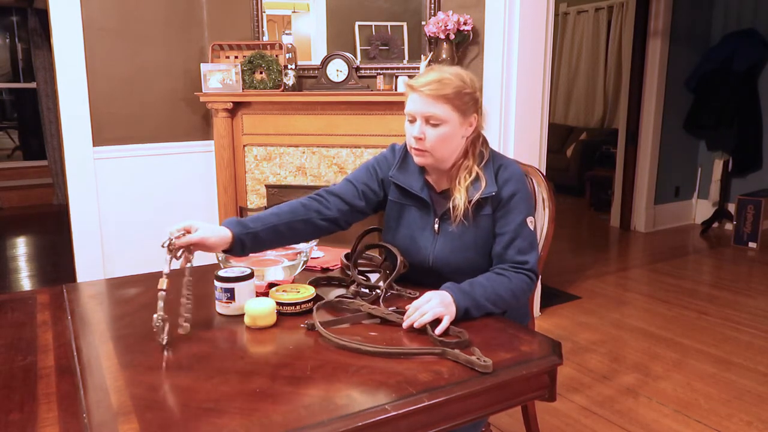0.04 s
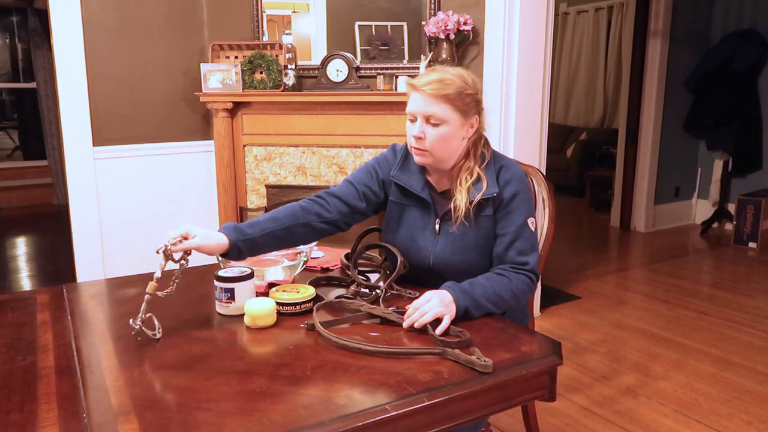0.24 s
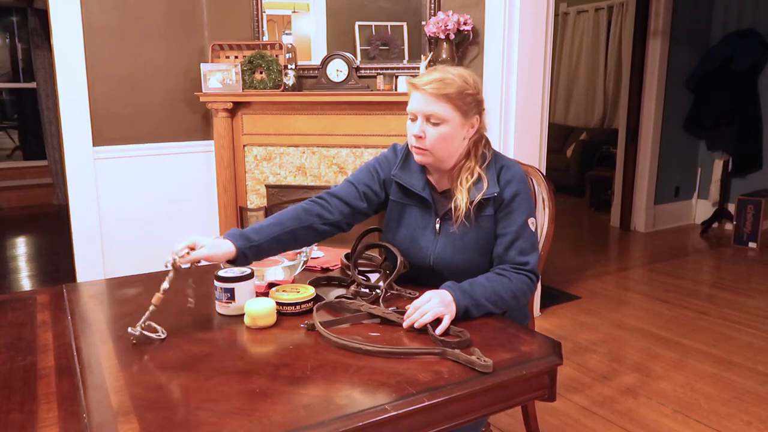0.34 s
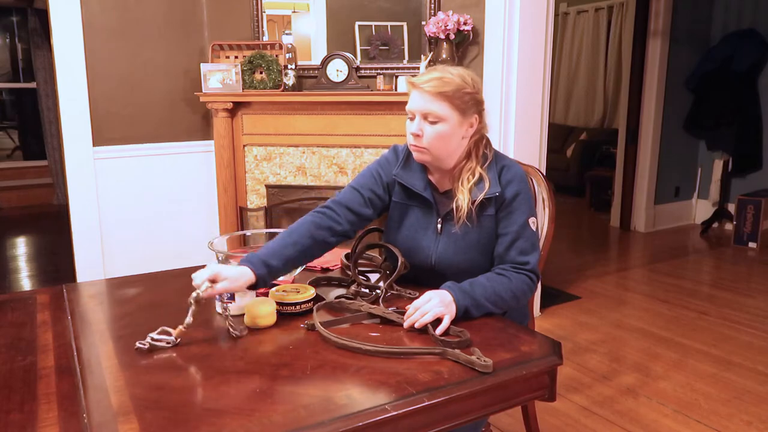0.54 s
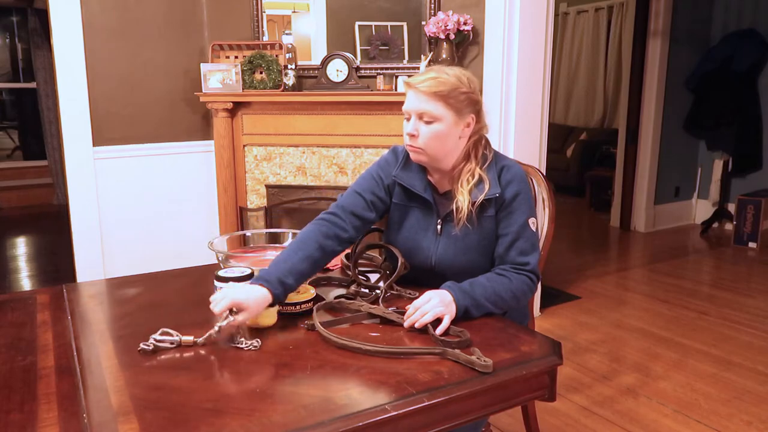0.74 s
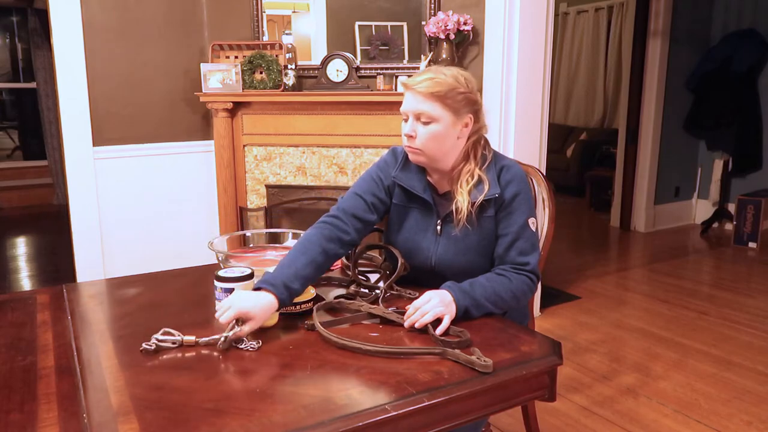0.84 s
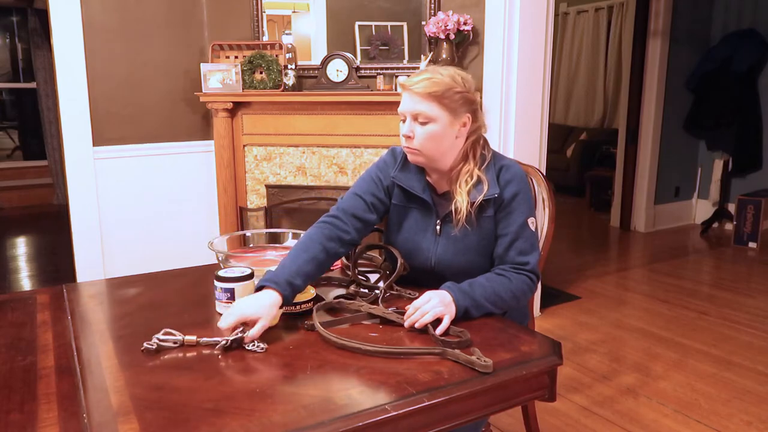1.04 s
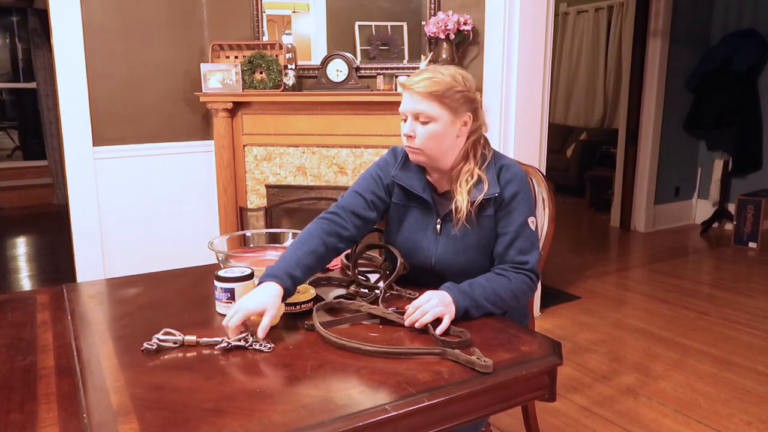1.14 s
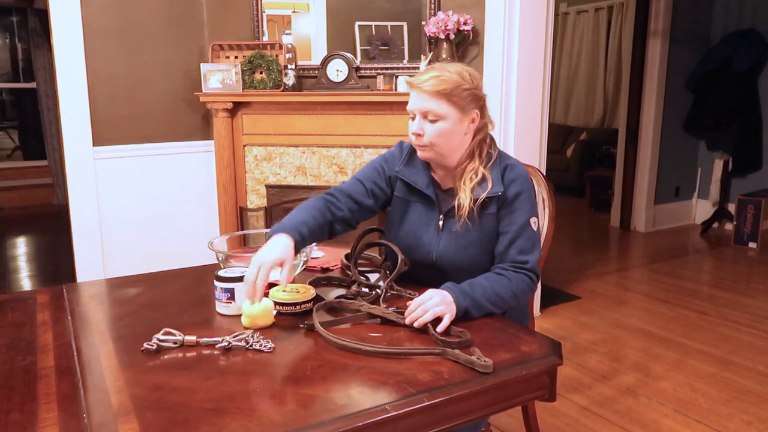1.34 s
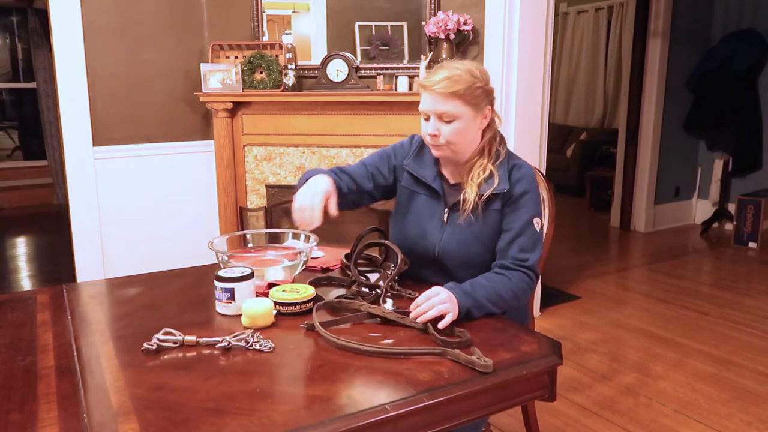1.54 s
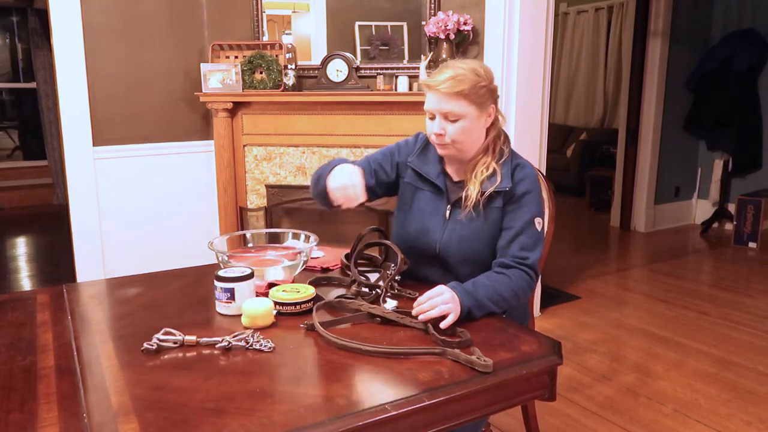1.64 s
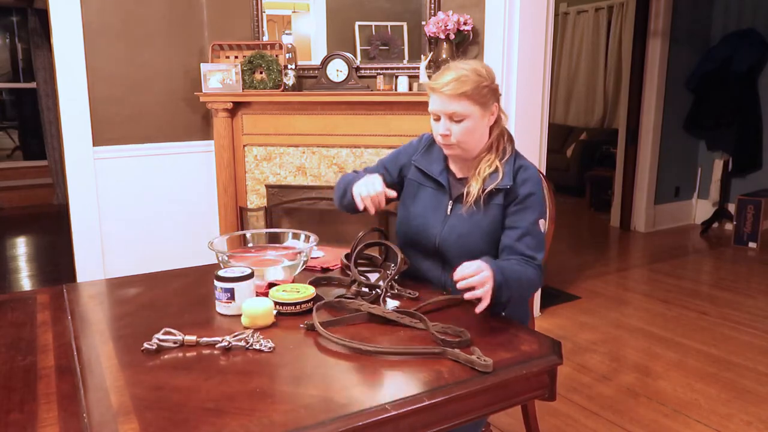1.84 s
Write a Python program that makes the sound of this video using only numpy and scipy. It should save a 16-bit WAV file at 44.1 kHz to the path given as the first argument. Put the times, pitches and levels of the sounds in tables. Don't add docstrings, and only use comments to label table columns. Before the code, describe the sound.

A metal horse bit clatters onto a wooden tabletop with a knock, sharp taps and jingling links

```python
import sys
import numpy as np
from scipy import signal
from scipy.io import wavfile
from scipy.ndimage import uniform_filter1d, minimum_filter1d

SR = 44100
rng = np.random.default_rng(int(sys.argv[2]) if len(sys.argv) > 2 else 0)


def generate_wav(signal):
    frames = np.transpose(np.atleast_2d(signal))
    scaled = np.clip(frames, -1, 1) * 32767
    pcm = np.round(scaled).astype(np.int16)
    wavfile.write(sys.argv[1], SR, pcm)


def ratio_of_db(decibels):
    return 10 ** (np.asarray(decibels, float) / 20)


N = 83790


def evened(x):
    return x / np.sqrt(np.mean(x ** 2) + 1e-20)


def read(points, hz):
    f, value = np.transpose(points)
    return np.interp(np.log(hz + 1), np.log(f + 1), value)


def add(mix, s, sound):
    part = mix[round(s * SR):][:len(sound)]
    part += sound[:len(part)]


def shaped(x, points):
    log_gain = np.log(ratio_of_db(read(points, abs(np.fft.fftfreq(4096, 1 / SR)))))
    response = np.fft.ifft(np.exp(np.conj(signal.hilbert(log_gain)))).real[:2048]
    return signal.fftconvolve(x, response)[:len(x)]


def blip(hz, cycles):
    u = np.arange(1500) / SR * hz / cycles
    wave = u ** 1.6 * np.exp(-2.4 * u ** 1.4) * np.sin(2 * np.pi * u * cycles)
    return wave / abs(wave).max()


def ring(hz, db, t60, phase, seconds, rise_s):
    t = np.arange(0, seconds, 1 / SR)
    modes = ratio_of_db(db - 60 * t[:, None] / t60) * np.sin(2 * np.pi * (hz * t[:, None] + phase))
    return modes.sum(1) * np.minimum(t / rise_s, 1)


def tail(decays):
    hz, t, z = signal.stft(rng.standard_normal(SR), SR, nperseg=256)
    fade = ratio_of_db(-60 * t / read(decays, hz)[:, None])
    x = signal.istft(z * fade, SR, nperseg=256)[1][:SR]
    x = x * np.clip(np.arange(SR) / SR / 0.0016 - .5, 0, 1)
    return x / np.linalg.norm(x)


# (time [s], peak level [dB], click pitch [Hz], wooden thump [dB re click], chime [dB re click])
CONTACTS = [(.2040, -6.5, 1325, 1, 1.5), (.4056, -3.5, 2050, -21, -16), (.4201, -3.5, 2200, -20, -14),
            (.5036, -1, 2680, -22, -10), (.5593, -.5, 2450, -24, -12), (.6316, 0, 2150, -19, -13),
            (0.442, -12, 2560, -9, -21), (.5190, -4.5, 2270, -15, -18), (0.5412, -17.5, 2860, -14, -34),
            (.5500, -9, 2900, -22.5, -10.5), (0.598, -4.5, 2500, -22.5, -17.5),
            (0.6077, -8, 2370, -19, -7.5), (0.6204, -8.5, 2400, -18.5, -23), (.6440, -16.5, 1300, -9, -3),
            (.7870, -16, 1860, -18.5, -6.5), (0.823, -8.5, 2740, -19.5, -8.5), (.8290, -19, 2240, -24, -7),
            (.8370, -14, 1700, -11, -8), (.8550, -20.5, 1620, -6, -12.5), (.8740, -12.5, 2535, -16, -13.5),
            (0.9309, -15.5, 2590, -31, -12.5), (.9551, -27.5, 2240, -30, 3), (.9675, -17, 2450, -32.5, -4),
            (1.0182, -14, 1580, -6.5, -6), (1.0345, -19.5, 1310, -4, -13), (1.0550, -19, 1090, -6.5, -14.5),
            (1.0820, -23, 1580, -8.5, -18), (1.0979, -12, 2320, -25.5, -12.5),
            (1.1100, -17, 2530, -17.5, -16), (1.1354, -26, 1170, -0.5, -14.5),
            (1.1650, -32.5, 1140, 2.5, -7), (1.2217, -36, 1596, -20.5, 0.5),
            (1.2545, -27, 1900, -29.5, -17.5), (1.3884, -34.5, 1000, -14.5, -30),
            (1.4254, -14, 2000, -11, -25), (1.43, -12.5, 1431, -17.5, -5.5), (1.456, -19, 1074, -9, -1.5),
            (1.4660, -27, 2100, -5.5, -10)]


def taps():
    clicks, chimes = np.zeros(N), np.zeros(N)
    for s, peak_db, click_hz, thump_db, chime_db in CONTACTS:
        cycles = 1.35 + .04 * max(-3.5 - peak_db, 0)
        click = blip(click_hz, cycles)
        click += ratio_of_db(-15) * blip(3350, 3.2)
        click += ratio_of_db(thump_db + 2.5) * blip(559, 1)
        click *= ratio_of_db(peak_db)
        if peak_db < -9.5:
            for late_s in np.append(0, .007 * abs(rng.uniform(-0.95, 1, 3))):
                add(clicks, s + late_s, click * ratio_of_db(-5))
        else:
            add(clicks, s, click)
        chime_hz = click_hz * (1 + .17 * rng.uniform(-0.95, 1, 4))
        phase = rng.uniform(-0.95, 1, 4)
        add(chimes, s, ring(chime_hz, peak_db + chime_db, .02, phase, seconds=.073, rise_s=.0023))
    add(clicks, CONTACTS[0][0], ratio_of_db(-11) * blip(3000, 1.35))
    return clicks, chimes


# (frequency [Hz], level [dB], t60
# [s])
TABLE_MODES = [(263.2, 3, 0.15), (398, 1, 0.34), (545.2, -2.5, 0.25), (625, -8, 0.44), (768.7, 4.5, 0.25),
               (797, -0.5, 0.15), (920, -6.5, 0.15), (1050, 8.5, 0.17), (1287, 3.5, 0.1),
               (1533, -15.5, 0.15), (1590, -16.5, 0.44), (1800, -12.5, 0.25), (2000, -11, 0.26),
               (2353, 5.5, 0.051),
               (142, -13, 0.47), (496.5, 2, 0.23)]


def tabletop():
    out = np.zeros(N)
    hz, db, t60 = np.transpose(TABLE_MODES)
    for k, (s, peak_db, _, thump_db, _) in enumerate(CONTACTS):
        strength, phase, spot = rng.random((3, len(hz)))
        if k == 0:
            sound = ring(hz, db, t60, phase, seconds=.5, rise_s=.0017)
        else:
            spot_hz = hz * (1 + .088 * (spot - .5))
            sound = ring(spot_hz, db + 9 - 14 * strength, .3 * t60, phase, seconds=.2, rise_s=.0017)
        add(out, s, ratio_of_db(peak_db + thump_db - 11) * sound)
    return out


# (time [s], level [dB])
LEG_THUDS = [
    (0.243, -40),
    (0.441, -32.5),
    (0.534, -22),
    (0.563, -36),
    (0.644, -26),
    (0.679, -28.5),
    (1.498, -27),
]


def thuds():
    out, thud_hz, cycles = np.zeros(N), 110, 2
    t = np.arange(0, 3 * cycles / thud_hz, 1 / SR)
    u = t * thud_hz / cycles
    for s, db in LEG_THUDS:
        pitch = rng.uniform(0.86, 1.4)
        add(out, s, ratio_of_db(db) * u * np.exp(1 - 2 * u) * np.sin(2 * np.pi * thud_hz * pitch * t))
    return out


# (time [s], rattle level [dB], bright jingle level [dB])
LINKS = [(.203, -80, -90), (.212, -46, -60), (.39, -52, -66), (.43, -38, -50), (.5, -38, -54),
         (.56, -33, -46), (.65, -33, -45), (.75, -42, -58), (.85, -36, -58), (.97, -38, -60),
         (1.085, -44, -62), (1.105, -31, -48), (1.2, -40, -58), (1.27, -38, -56), (1.35, -52, -68),
         (1.415, -60, -76), (1.435, -44, -60), (1.62, -72, -88)]


def rattle(column, per_s, lo_hz, hi_hz, cycles):
    size = ratio_of_db(3.5 * np.minimum(rng.exponential(1, N), 3))
    ticks = size * (rng.random(N) < per_s / SR)
    which = rng.integers(0, 8, N)
    x = np.zeros(N)
    for k, hz in enumerate(np.geomspace(lo_hz, hi_hz, 8)):
        x += signal.fftconvolve(ticks * (which == k), blip(hz, cycles))[:N]
    s, db = np.transpose(LINKS)[[0, column]]
    return evened(x) * ratio_of_db(np.interp(np.arange(N) / SR, s, db))


# (frequency [Hz], gain [dB])
JINGLE_COLOUR = [(2000, 10.5), (4000, 14), (5500, 7), (8000, -4)]


def jingle():
    return shaped(rattle(column=2, per_s=1100, lo_hz=2900, hi_hz=7500, cycles=5), JINGLE_COLOUR)


# (frequency [Hz], level [dB])
RING_MODES = [(4070, 8.5), (5098, 6), (6936, 3.5), (7250, 0), (7704, 4.5), (7940, -16), (9001, 0),
              (10090, -9), (10600, -11), (11860, -9), (12960, -40), (13420, -6), (14300, -49), (14630, -16)]
# (frequency [Hz], level [dB])
BUCKLE_MODES = [(6939, -60), (7940, -54), (8839, -50), (10083, -58.5), (10524, -63), (11900, -71),
                (14500, -70.5)]
# (frequency [Hz], level [dB])
MOUTH_MODES = [(7063, -75), (8172, -80), (8301, -63), (8877, -72), (10174, -84), (10524, -70),
               (12705, -54.5), (13437, -66.5), (13770, -52), (13910, -82), (15138, -83.5), (15364, -58),
               (15499, -54.5)]
# (time [s], level [dB])
RING_HITS = [
    (0.211, -64.5),
    (0.234, -53),
    (0.314, -58.5),
    (1.198, -77.5),
]
# (time [s], level [dB])
BUCKLE_HITS = [
    (0.409, 6.5),
    (.428, 12.5),
    (0.472, 2),
    (.505, -1),
    (0.638, 10.5),
    (1.031, -18.5),
    (1.109, -37),
    (1.15, -30),
    (1.19, -15),
    (1.272, -31.5),
]
# (time [s], level [dB])
MOUTH_HITS = [(.17, -6.5), (0.503, -1), (0.531, -1), (0.558, 11.5), (0.586, 15), (0.618, 15.5), (0.64, 7.5),
              (0.702, -1.5), (0.784, -2), (0.821, -4), (0.962, -22.5), (1.039, -15.5), (1.097, 2.5),
              (1.175, -12.5), (1.27, -17.5)]
BEAT_SPREAD = [80, 90, 260]


def clinks():
    dry = np.zeros(N)
    parts = [RING_MODES, BUCKLE_MODES, MOUTH_MODES]
    hits, t60s = [RING_HITS, BUCKLE_HITS, MOUTH_HITS], [.16, .12, .06]
    for part, contacts, t60, apart_hz in zip(parts, hits, t60s, BEAT_SPREAD):
        hz, db = np.transpose(part * 3)
        detuned = np.arange(len(hz)) >= len(part)
        hz = hz + apart_hz * (hz / 10000) * rng.uniform(-1, 1, len(hz)) * detuned
        for s, hit_db in contacts:
            mode_db = db + hit_db - 11 + 3 * rng.standard_normal(len(hz))
            add(dry, s, ring(hz, mode_db, t60, rng.random(len(hz)), seconds=.3, rise_s=.00085))
    echo = [(20, .11), (9000, .11)]
    return [share * dry + ratio_of_db(8) * signal.fftconvolve(dry, tail(echo))[:N] for share in (.7, .3)]


# (frequency [Hz], t60 [s])
ROOM_DECAY = [(100, 1), (260, 0.98), (700, 0.46), (1840, 0.45), (4850, 0.094), (12000, 0.14)]


def room(x):
    turn, out = np.arange(N) / SR * 7.3, np.zeros(N)
    for k in range(3):
        scatter = ratio_of_db(-10) * tail([(20, .092), (9000, .092)])
        answer = scatter + ratio_of_db(-2.5) * tail(ROOM_DECAY)
        share = np.sqrt(2 / 3) * np.cos(np.pi * (turn + k / 3))
        out += signal.fftconvolve(x * share, answer)[:N]
    return out


# (frequency [Hz], level [dB per Hz])
FLOOR_SPECTRUM = [(12, -13), (20, -11), (118, -1), (318, -14.5), (384, -13.5), (1040, -22.5), (1160, -18),
                  (12300, -45.5), (16000, -76.5), (22000, -120)]
# (frequency [Hz], level [dB per Hz])
FLOOR_TOP = [(13400, -95)]
# (frequency [Hz], level [dB])
FLOOR_SIDE = [(60, -45), (180, -12.5), (550, -2.5), (1650, -4.5), (4970, 1), (15000, 1)]


def floor():
    frames, hz = N // 256 + 5, np.fft.rfftfreq(1024, 1 / SR)
    a, b, c, d, patches = rng.standard_normal((5, 513, frames))
    patches = uniform_filter1d(patches, size=10, axis=0)
    patches = evened(uniform_filter1d(patches, size=12, axis=1))
    z = np.array([a + 1j * b, (c + 1j * d) * ratio_of_db(read(FLOOR_SIDE, hz))[:, None]])
    level_db = read(FLOOR_SPECTRUM + FLOOR_TOP, hz)[:, None] + .7 * patches
    x = signal.istft(z * ratio_of_db(level_db), nperseg=1024, noverlap=768)[1][:, :N]
    x = ratio_of_db(-49) * x / np.std(x[0])
    throb = evened(uniform_filter1d(rng.standard_normal(N), size=900))
    whine = ratio_of_db(-79 + 4 * throb) * np.sin(2 * np.pi * 12950 * np.arange(N) / SR)
    return x + whine * np.array([[1], [.5]])


def ducking(x):
    from_db, share, recovery_db_per_s = -36, .14, 83
    power_db = 10 * np.log10(abs(uniform_filter1d(x ** 2, size=600)) + 1e-12)
    fall = np.arange(N) * recovery_db_per_s / SR
    held_db = np.maximum.accumulate(power_db + fall) - fall
    over_db = np.maximum(held_db - from_db, 0)
    return ratio_of_db(-share * uniform_filter1d(over_db, size=400))


# (frequency [Hz], gain [dB])
TAP_COLOUR = [(40, -10), (150, -3), (500, 0), (3300, 0), (4500, -7), (6000, -13), (9000, -26), (15000, -40)]
# (frequency [Hz], level [dB])
SIDE_WIDTH = [(60, -34), (180, -35), (550, -16), (1650, -11.5), (4970, 1), (15000, 20)]


def scene():
    clicks, chimes = taps()
    body = tabletop() + thuds()
    links = rattle(column=1, per_s=1300, lo_hz=900, hi_hz=4100, cycles=1.145)
    hits = shaped(clicks + links, TAP_COLOUR) + .35 * chimes
    bright, steel = jingle(), clinks()
    mid = hits + .65 * chimes + body + .5 * bright + steel[0]
    mid = mid + room(hits + bright + .3 * body)
    side = .15 * (hits + body) + ratio_of_db(-4) * room(hits + bright + .5 * body)
    side = shaped(side, SIDE_WIDTH) + ratio_of_db(4) * steel[1]
    quiet, duck = floor(), ducking(mid)
    high_pass = signal.butter(4, 8200, "high", fs=SR, output="sos")
    treble = signal.sosfiltfilt(high_pass, quiet)
    mid, side = np.array([mid, side]) + (quiet - treble) * duck + treble * duck ** 10
    return np.array([mid + side, mid - side]) * ratio_of_db([[.15], [-.15]])


def low_pass(x):
    return signal.sosfilt(signal.butter(12, 15640, fs=SR, output="sos"), x)


def record(dry):
    ceiling = .84
    gain = ceiling / np.maximum(abs(dry).max(0), ceiling)
    gain = uniform_filter1d(minimum_filter1d(gain, size=161), size=161)
    return low_pass(dry * gain)


dry = scene()
out = record(dry)
generate_wav(out)
```